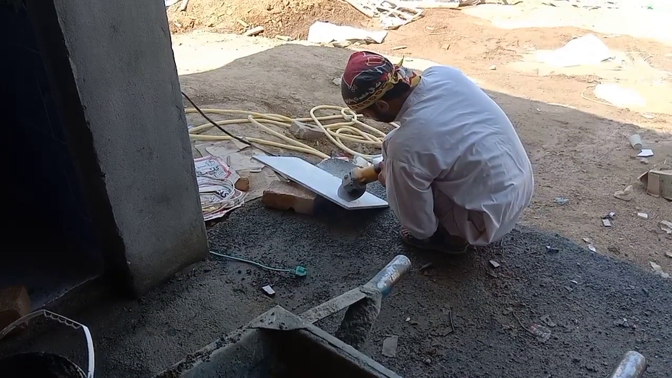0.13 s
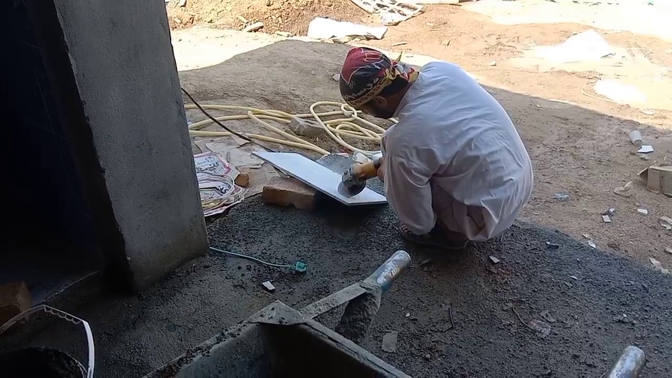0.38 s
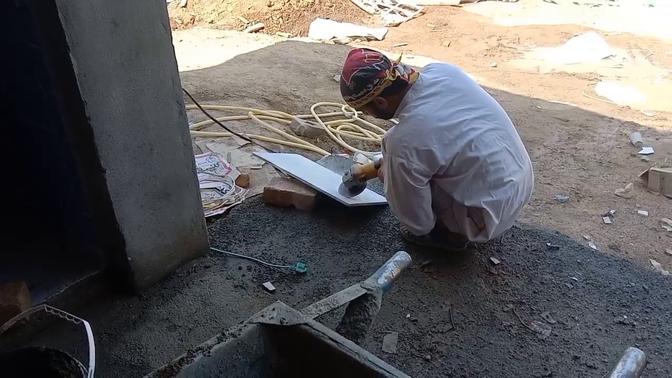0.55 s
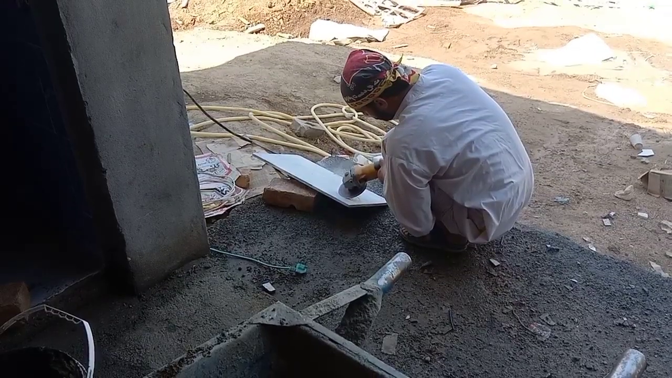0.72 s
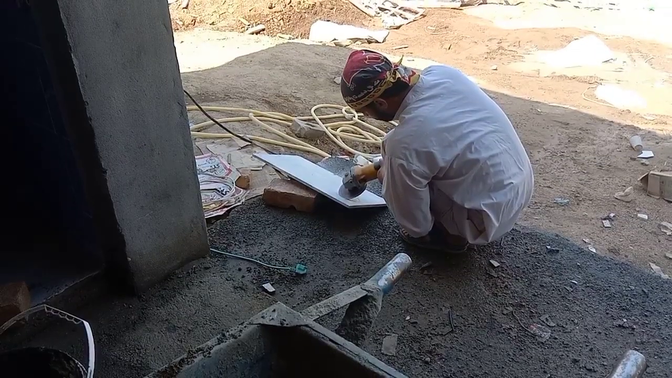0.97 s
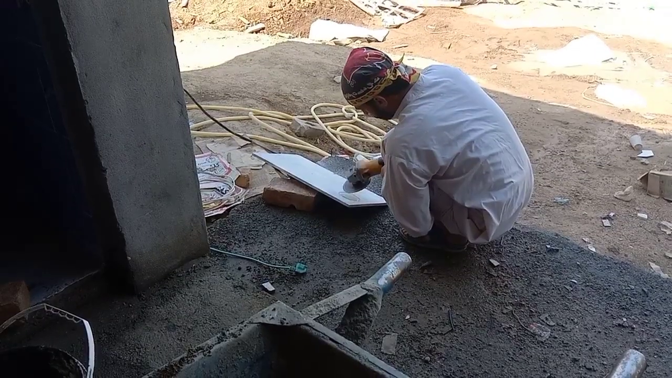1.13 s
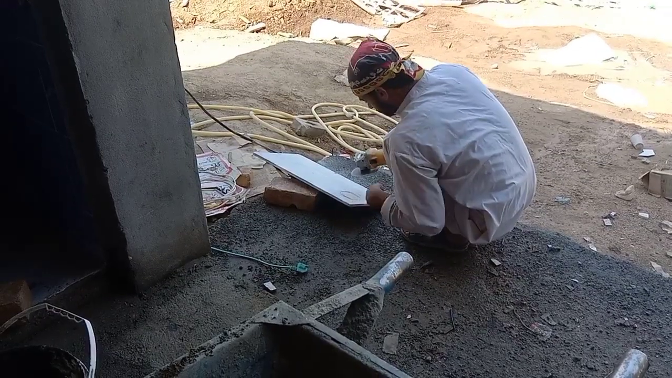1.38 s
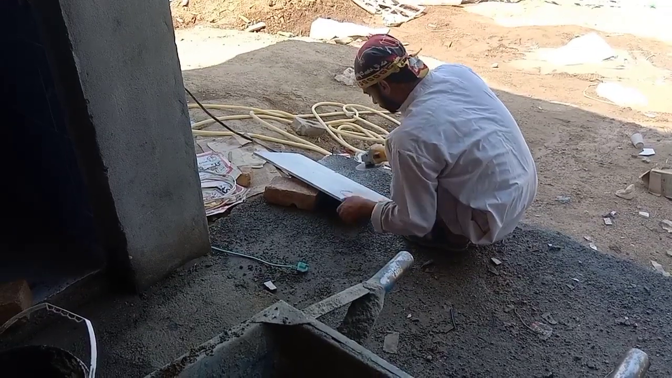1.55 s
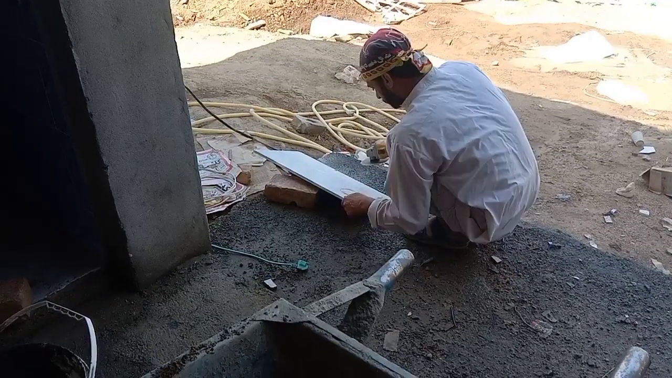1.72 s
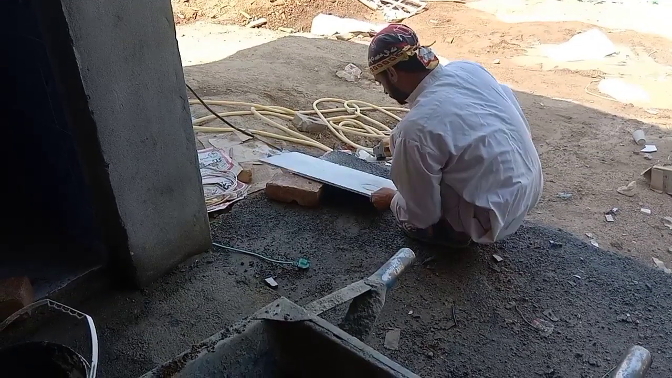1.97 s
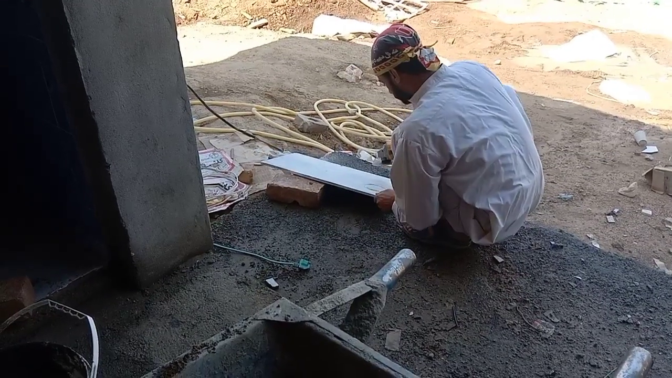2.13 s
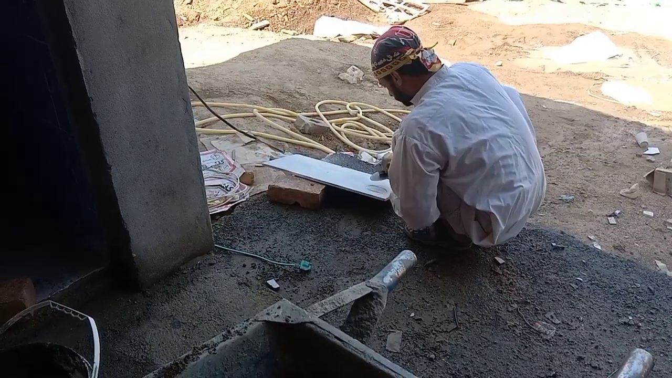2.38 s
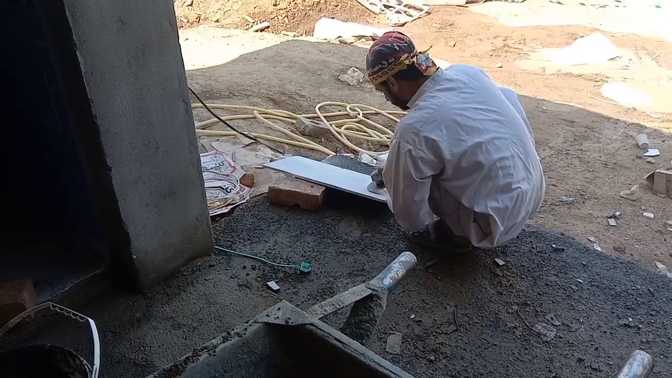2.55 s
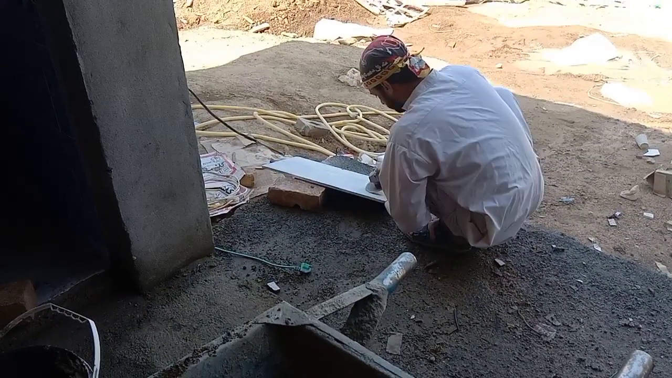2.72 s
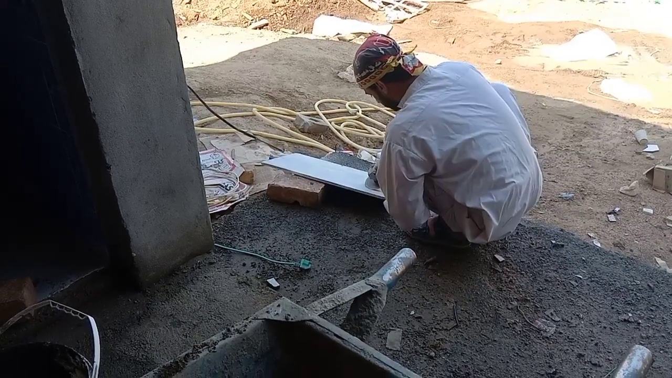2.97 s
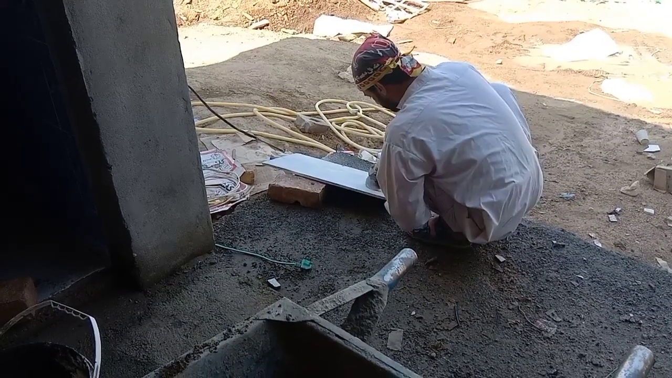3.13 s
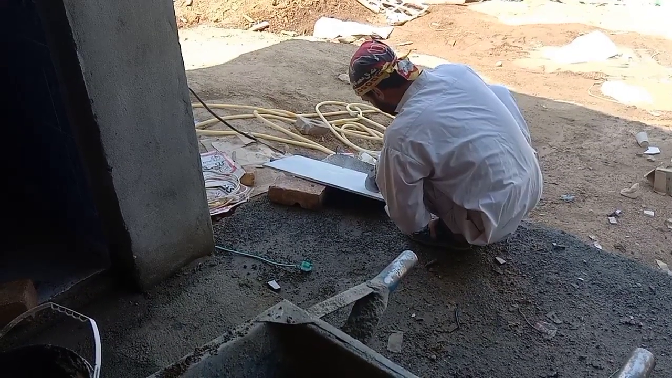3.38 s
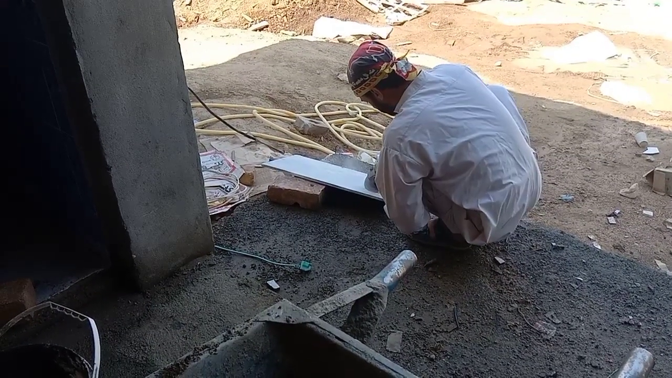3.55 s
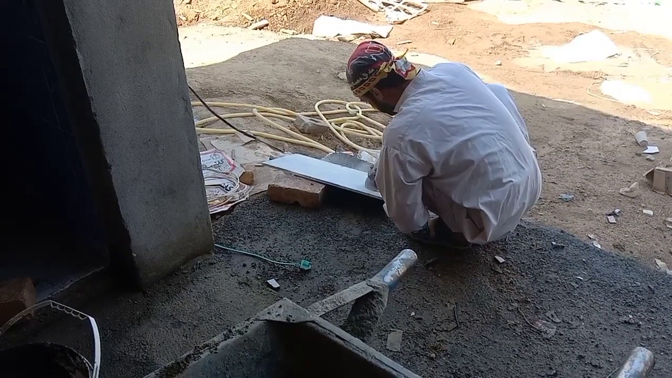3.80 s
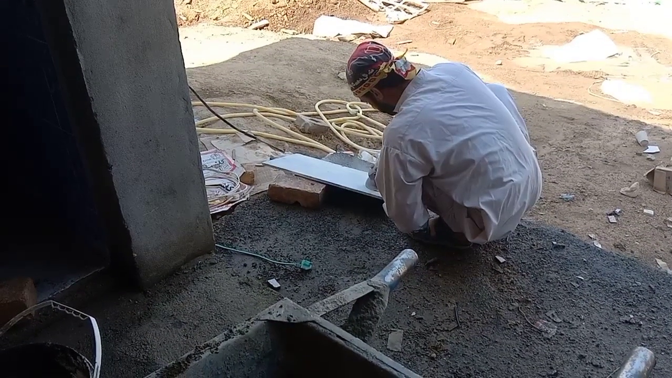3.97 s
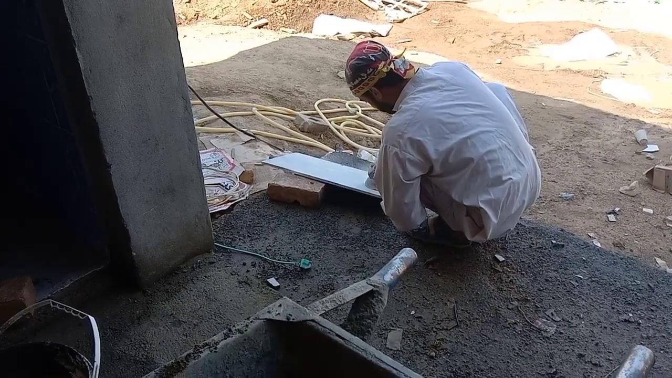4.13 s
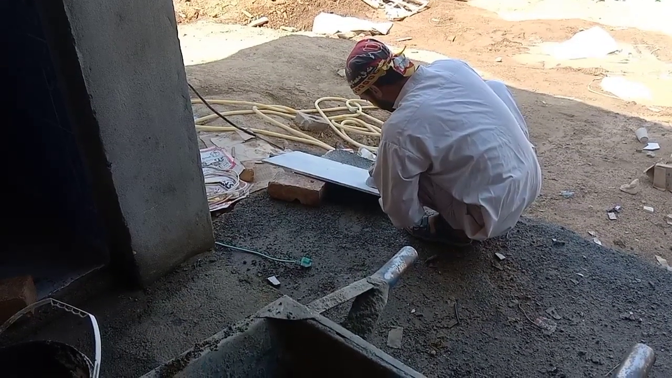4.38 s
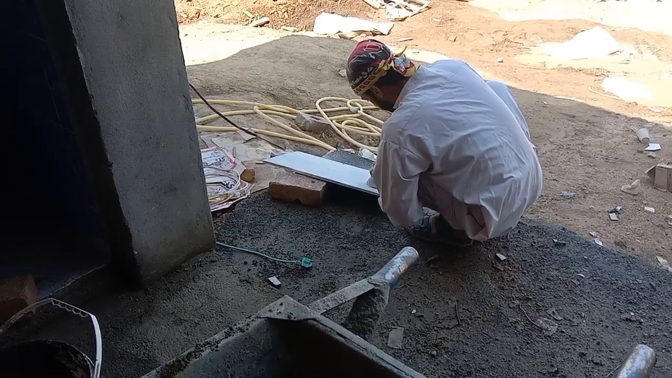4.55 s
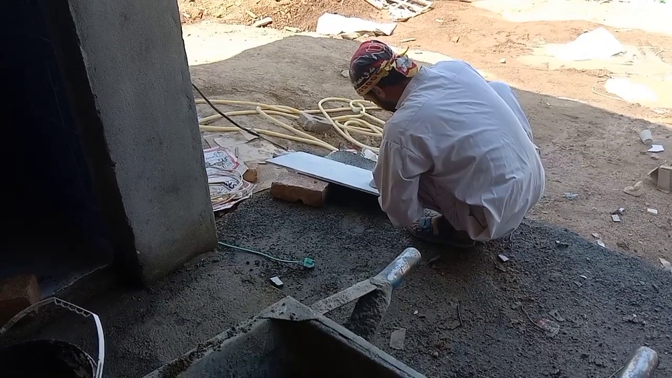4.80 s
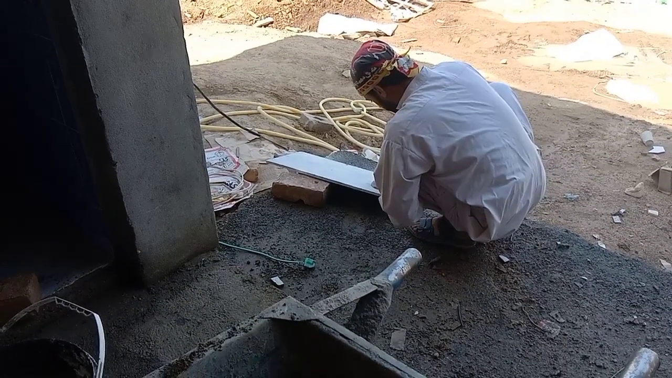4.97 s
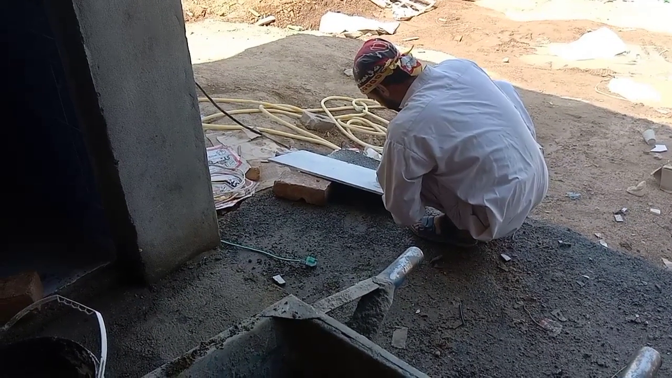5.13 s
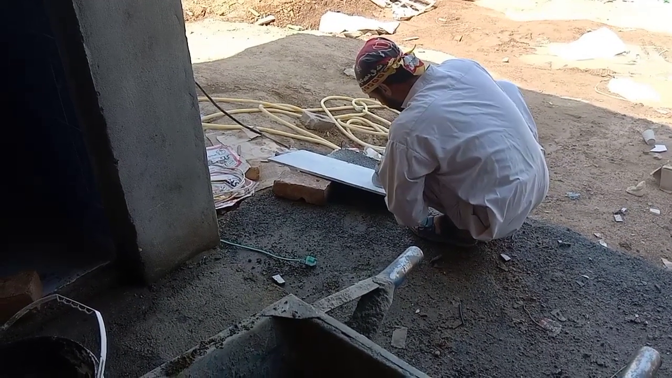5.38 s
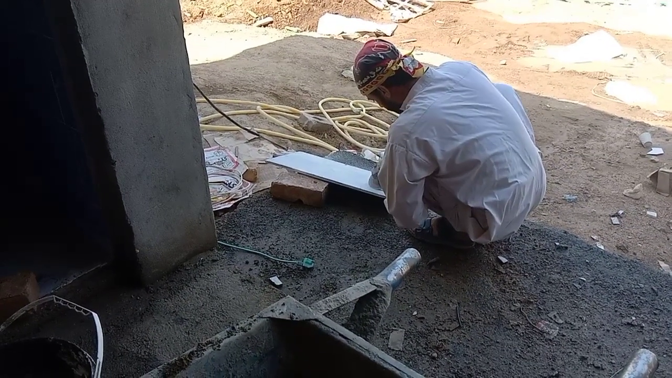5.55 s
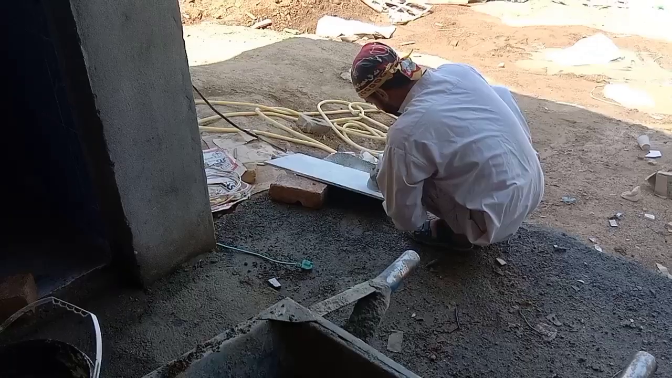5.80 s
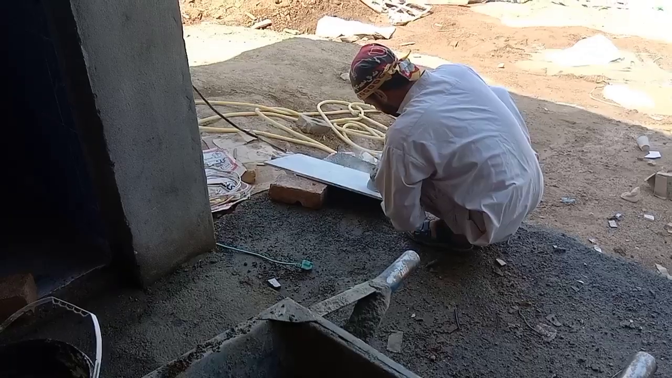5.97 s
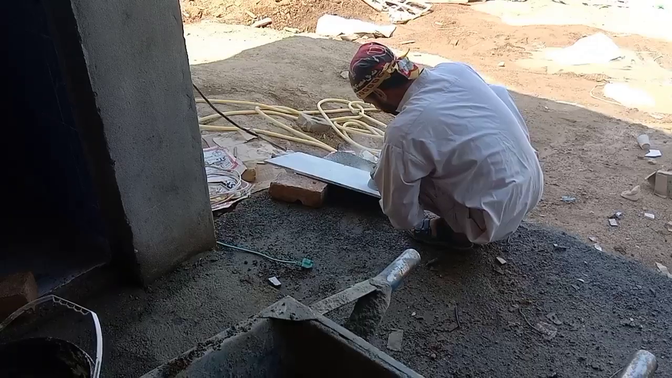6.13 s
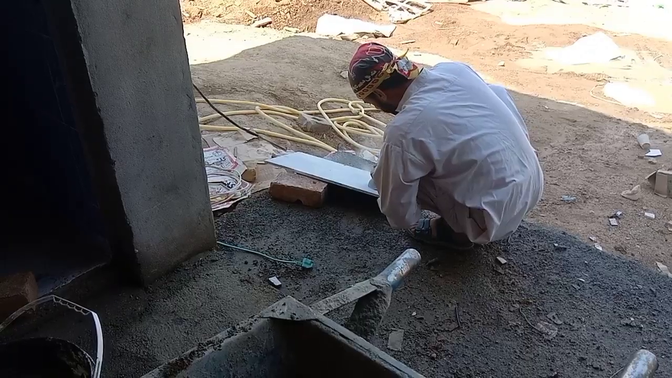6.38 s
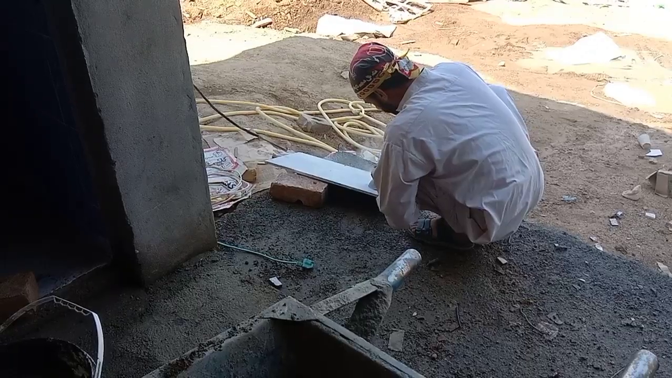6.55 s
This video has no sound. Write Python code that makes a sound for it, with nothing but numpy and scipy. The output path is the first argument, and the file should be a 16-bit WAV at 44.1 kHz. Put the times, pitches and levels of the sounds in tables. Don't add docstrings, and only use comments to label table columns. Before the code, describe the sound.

Loud metallic grinding of a spinning disc on marble, with brief free-running motor hum and hiss between passes, close and slightly overdriven.

```python
import sys
import numpy as np
from scipy import signal
from scipy.fft import rfft, irfft
from scipy.io import wavfile
from scipy.ndimage import uniform_filter1d

SR = 44100
rng = np.random.default_rng(int(sys.argv[2]) if len(sys.argv) > 2 else 0)


def waveform_to_disk(signal):
    frames = np.transpose(np.atleast_2d(signal))
    scaled = np.clip(frames, -1, 1) * 32767
    samples = np.round(scaled).astype(np.int16)
    wavfile.write(sys.argv[1], SR, samples)


def voltage_ratio(decibels):
    exponent = np.asarray(decibels, float) / 20
    return 10 ** exponent


N = 291942

SHALLOW_FROM_S, DEEP_FROM_S, SINKING_S = 2.0, 3.7, 0.32
BRIEF_S = .3


def rms_one(x):
    return x / np.sqrt(np.mean(x ** 2) + 1e-20)


def in_time(rows):
    s, *columns = np.transpose(rows)
    return [np.interp(np.arange(N) / SR, s, column) for column in columns]


def drift(rate_hz):
    r = np.exp(-80 * np.pi * rate_hz / SR)
    slow = signal.lfilter([1], [1, -2 * r, r * r], rng.standard_normal(N // 40 + 2002))
    slow = slow[2000:]
    return np.interp(np.arange(N) / 40, np.arange(len(slow)), rms_one(slow))


def resonate(x, hz, width_hz):
    r = np.exp(-np.pi * max(width_hz, 4) / SR)
    return signal.lfilter([(1 - r * r) / 2, 0, (r * r - 1) / 2], [1, -2 * r * np.cos(2 * np.pi * hz / SR), r * r], x)


def resonate_twice(x, hz, width_hz, second_width_hz):
    return resonate(resonate(x, hz, width_hz), hz, second_width_hz)


def coloured(x, spectrum):
    hz, db = np.transpose(spectrum)
    grid_hz = np.fft.rfftfreq(N, 1 / SR) + 1
    gain = voltage_ratio(np.interp(np.log(grid_hz), np.log(hz), db))
    return rms_one(irfft(rfft(x) * gain, N))


def grit(per_s, spread_db):
    sizes = voltage_ratio(spread_db * np.minimum(rng.exponential(1, N), 4)) * rng.choice([-1, 1], N)
    return rms_one(sizes * (rng.random(N) < per_s / SR))


# [lands t/s, lifts t/s, contact level/dB, top modes over contact level/dB,
# slab ring at first level/dB]
CUTS = [
    (-1.0, 1.1, -17, 0, -60),
    (2.611, 2.693, -11.5, 1, -40),
    (2.738, 2.815, -27, 6, -44),
    (2.83, 5.005, -13.3, -2, -50),
    (5.337, 5.358, -14, -6, -30),
    (5.486, 5.518, -26, 10, -42),
    (5.55, 7.0, -13.3, -2, -46),
    (6.0, 7.0, -34, 8, -60),
]
# [t/s, level/dB]
HAND_PRESSURE = [(0, 0), (.2, 1), (1.05, -1), (2.83, -7), (2.86, -.5), (2.93, -1.5), (2.96, -4.5),
                 (3.05, -1), (3.2, -1.5), (3.27, -5.5), (3.33, -1), (3.43, -1.5), (3.6, 1.5), (4.6, -1),
                 (5.0, -.5), (5.62, -2), (5.8, .5), (6.62, 0)]


def passes():
    bite_s, lift_db_per_s, bounce_db_per_s, top_lift_db_per_s = .003, 135., 330., 150.
    slab_full_db, slab_builds_s, slab_waver_db = -31, .45, 2.5
    t = np.arange(N) / SR
    contact, top, ring = np.full((3, N), 1e-6)
    for lands, lifts, db, top_db, slab_db in CUTS:
        bite = np.clip((t - lands) / bite_s, 0, 1)
        after = np.maximum(t - lifts, 0)
        fall_db_per_s = lift_db_per_s if lifts - lands > BRIEF_S else bounce_db_per_s
        hold = bite * voltage_ratio(-after * fall_db_per_s)
        still_to_grow = np.exp(-np.clip(t - max(lands, 0), 0, 9) / slab_builds_s)
        growing_db = slab_full_db + (slab_db - slab_full_db) * still_to_grow
        contact = contact + voltage_ratio(db) * hold
        top = top + voltage_ratio(db + top_db - top_lift_db_per_s * after) * hold
        if lands > SHALLOW_FROM_S and db > -30:
            ring = ring + voltage_ratio(growing_db - top_lift_db_per_s * after) * hold
    contact_db, top_db, ring_db = 20 * np.log10([contact, top / contact, ring])
    return contact_db + in_time(HAND_PRESSURE)[0], top_db, ring_db + slab_waver_db * drift(6.0)


# [f/Hz, width f/Hz, level/dB]
EDGE_MODES = [(1010, 120, -19), (1600, 150, -19), (2350, 30, -14), (3090, 61, -2), (3280, 45, -5),
              (3520, 67, 0), (3950, 69, 1), (4390, 43, -10), (4770, 32, -14), (5050, 62, -1),
              (5610, 63, -3), (6500, 50, 0), (7200, 43, -7), (7960, 73, -22), (8340, 42, -17),
              (9110, 43, -12), (9860, 48, -13), (10500, 57, -9), (11200, 48, -5), (11900, 50, -8),
              (12800, 90, -15), (13600, 57, -14), (13900, 140, -11), (14200, 34, -8), (15000, 55, -19),
              (15400, 65, -19)]
# [f/Hz, width f/Hz, level/dB]
SHALLOW_MODES = [(1440, 62, -19), (2410, 28, -18), (2730, 26, -14), (3000, 73, -6), (3270, 33, -4),
                 (3500, 92, -4), (4050, 52, -7), (4320, 22, -9), (5110, 55, -1), (5520, 55, -5),
                 (5820, 90, -13), (6410, 35, -8), (6620, 41, 0), (7100, 35, -15), (8130, 58, -25),
                 (8460, 45, -19), (8980, 30, -11), (9440, 29, -19), (10100, 34, -11), (10600, 42, -11),
                 (11100, 33, -8), (11500, 49, -17), (11800, 95, -19), (12200, 42, -11), (12600, 28, -25),
                 (13000, 39, -12), (13400, 26, -14), (13700, 62, -12), (14500, 48, -14), (15100, 96, -22)]
# [f/Hz, width f/Hz, level/dB]
DEEP_MODES = [(1670, 150, -19), (1940, 42, -17), (2410, 27, -15), (3130, 57, -7), (3500, 69, -3),
              (4010, 77, -8), (4340, 44, -11), (5050, 70, -4), (5580, 35, -3), (6550, 46, 0),
              (6920, 24, -18), (7170, 58, -13), (8050, 86, -26), (8390, 51, -18), (9060, 69, -16),
              (9600, 63, -20), (9950, 85, -16), (10500, 44, -11), (11200, 55, -14), (11600, 98, -18),
              (12000, 150, -17), (12900, 63, -13), (13500, 48, -16), (13900, 120, -13), (14300, 130, -13),
              (15000, 89, -25), (15400, 50, -22)]
# [f/Hz, level/dB]
DISC_RADIATION = [(1500, -3), (3300, -3.5), (4300, -2.5), (5300, -3), (6600, -1.5), (8000, -1.5),
                  (11000, -0.5), (13500, 0), (15500, -8)]
# [f/Hz, level/dB per Hz]
DUST_SPECTRUM = [(150, -73), (250, -48.5), (755, -39.5), (1050, -27.5), (2240, -9.5), (3450, 6.5),
                 (4630, -17.5), (4960, -3), (6000, -7.5), (6650, 7), (7900, -36.5), (14000, -4),
                 (15500, -13)]


def disc(contact_db, top_db):
    t = np.arange(N) / SR
    deep = np.clip((t - DEEP_FROM_S) / SINKING_S + .5, 0, 1)
    seats = [(EDGE_MODES, 1. * (t < SHALLOW_FROM_S)),
             (SHALLOW_MODES, (t >= SHALLOW_FROM_S) * (1 - deep)),
             (DEEP_MODES, deep)]
    chips = grit(9000., spread_db=3.5) * voltage_ratio(1.18 * drift(68.0))
    touch = landings(decay_s=0.017)
    low_drive = chips * (voltage_ratio(contact_db) + touch)
    top_drive = chips * (voltage_ratio(contact_db + top_db) + 0.6 * touch)
    grips = [voltage_ratio(1.2 * drift(1.5)) for k in range(5)]
    carry_hz, carry_db = np.transpose(DISC_RADIATION)
    out = np.zeros(N)
    for modes, share in seats:
        live = np.flatnonzero(share > 0)
        span = slice(live[0], live[-1] + 4000)
        for k, (hz, width_hz, db) in enumerate(modes):
            is_top = hz > 7400
            drive = (top_drive if is_top else low_drive) * grips[k % 5] * np.sqrt(share)
            drive = drive[span] + 1e-18
            spread_hz = 1.77 * width_hz
            loss_hz = width_hz * (.55 if hz < 7400 else .7)
            mode_db = db + 18 + np.interp(np.log(hz), np.log(carry_hz), carry_db)
            ring = resonate(drive, hz, loss_hz) + 0.38 * resonate_twice(drive, hz, spread_hz, spread_hz)
            out[span] += (-1) ** k * voltage_ratio(mode_db) * ring
    dust = coloured(grit(12000., spread_db=-0.5), DUST_SPECTRUM)
    return out + (voltage_ratio(contact_db - 10) + .6 * landings(decay_s=.005)) * dust


# [t/s, turns f/Hz, rotor tone level/dB, housing hum level/dB]
MOTOR_RUN = [(0.9, 395, -66, -66), (1.2, 427, -56, -62), (1.45, 442, -42, -50), (1.65, 451, -37, -48),
             (1.74, 459, -48, -45), (2.43, 480, -35, -50), (2.72, 487, -44, -55), (3.0, 487, -43, -53),
             (3.38, 479, -40, -43), (3.7, 455, -52, -53), (3.84, 449, -46, -53), (4.3, 436, -66, -58),
             (5.04, 427, -66, -62), (5.23, 440, -43, -47), (5.47, 453, -36, -47), (5.61, 456, -64, -62),
             (5.88, 447, -47, -56), (6.05, 430, -66, -58)]
# [f/Hz, level/dB per Hz]
FAN_SPECTRUM = [(150, -82), (250, -41), (418, -24.5), (463, -24), (667, -25), (935, -16.5), (1250, -15),
                (1950, -9), (2190, -14), (3350, 1.5), (4290, -12), (5750, -2), (8300, -28), (10800, -63),
                (18300, -120)]
# [f/Hz, width f/Hz, level/dB]
HOUSING_MODES = [(8950, 700, -3), (9800, 350, -9), (10450, 350, -1), (11150, 600, -1), (11900, 150, 0),
                 (12500, 200, -5), (12980, 150, 0), (14000, 2500, -13)]


def motor(contact_db):
    fan_db, fan_choke_db, fan_recovers_s = -23.0, -7.5, .12
    load_roar_db, edge_roar_db = -9.5, 4.0
    hum_hz, hum_width_hz = 546, 16
    turns, tone_db, hum_db = in_time(MOTOR_RUN)
    recovery = int(fan_recovers_s * SR)
    loaded = uniform_filter1d(1. * (contact_db > -25), size=recovery * 2 + 1, origin=recovery)
    on_edge = np.arange(N) < SHALLOW_FROM_S * SR
    fan = voltage_ratio(fan_db + fan_choke_db * loaded ** 2)
    roar = voltage_ratio(contact_db + load_roar_db + edge_roar_db * on_edge)
    air = np.hypot(fan, roar)

    phase = 2 * np.pi * np.cumsum(uniform_filter1d(turns, size=3000) + 1.06 * drift(23.0)) / SR
    level = voltage_ratio(tone_db + 1.0 + 2.2 * drift(12.))
    tone = np.sqrt(2) * level * (np.sin(phase) + voltage_ratio(-14.0) * np.sin(2 * phase))

    rattle = grit(6000., spread_db=1.5) * voltage_ratio(0.4 * drift(21.0) + 0.72 * drift(40.0))
    whir = grit(7600.0, spread_db=5.0)
    housing = np.zeros(N)
    for hz, width_hz, db in HOUSING_MODES:
        housing += voltage_ratio(db + 1.3 * drift(8.)) * resonate_twice(whir, hz, width_hz, 1.3 * width_hz)
    hiss = coloured(rattle, FAN_SPECTRUM) + voltage_ratio(-12) * rms_one(housing)
    hum = rms_one(resonate_twice(rng.standard_normal(N), hum_hz, hum_width_hz, 80.))
    return tone + air * hiss + voltage_ratio(hum_db - 2.5) * hum


def ground():
    shake_db, shallow_db, lumps_db, idle_db = -58, -19, 4.0, -82
    t = np.arange(N) / SR
    band = signal.butter(2, [60., 220.], "band", fs=SR, output="sos")
    lumps = signal.sosfilt(band, grit(260., spread_db=2.5))
    pressed = np.zeros(N)
    for lands, lifts, *_ in CUTS:
        if lifts - lands > BRIEF_S:
            pressed += (t > lands) * (t < lifts)
    shallow = (t >= SHALLOW_FROM_S) * np.clip((DEEP_FROM_S - t) / SINKING_S * 4 - 1, 0, 1)
    level_db = shake_db + shallow_db * shallow + lumps_db * drift(9.0)
    return (pressed * voltage_ratio(level_db) + voltage_ratio(idle_db)) * rms_one(lumps)


def concrete_room(x, t60, level_db):
    t = np.arange(SR // 2) / SR
    tail = rng.standard_normal(len(t)) * voltage_ratio(-60 * t / t60) * (t > .008)
    tail = signal.lfilter([1], [1, -.4], tail)
    return voltage_ratio(level_db) * signal.fftconvolve(x, tail / np.sqrt(np.sum(tail ** 2)))[:N]


# [f/Hz, width f/Hz, level/dB]
SCRAPE_MODES = [(239, 57, -0.5), (370, 33, 1), (1040, 200, 14.5), (1310, 170, 13)]
# [f/Hz, width f/Hz, level/dB]
UPPER_PLATE_MODES = [(1410, 60, -6), (2410, 25, -5)]


def slab(ring_db):
    nudge_s, nudge_db, rise_db_per_s, fall_db_per_s = 2.05, -49, 70., 170.
    plate_hz, plate_width_hz = 1071, 16
    scrape = grit(900., spread_db=0.5)
    thud = np.zeros(N)
    for hz, width_hz, db in SCRAPE_MODES:
        thud += voltage_ratio(db) * rms_one(resonate_twice(scrape, hz, width_hz, 2 * width_hz))
    since = np.arange(N) / SR - nudge_s
    thud_db = nudge_db + np.minimum(rise_db_per_s * since, -fall_db_per_s * since)

    shake = rng.standard_normal(N)
    ring = rms_one(resonate_twice(shake, plate_hz, plate_width_hz, 100.0))
    ring /= (uniform_filter1d(ring ** 2, size=1500) + 0.068) ** .25
    for hz, width_hz, db in UPPER_PLATE_MODES:
        ring += voltage_ratio(db) * rms_one(resonate_twice(shake, hz, width_hz, 2.9 * width_hz))
    return voltage_ratio(ring_db - 2.5) * ring + voltage_ratio(thud_db) * thud


# [t/s, peak level/dB]
RIM_LANDINGS = [
    (2.612, -7),
    (2.7394, -18),
    (2.83, -17),
    (2.8959, -13),
    (3.2844, -14.5),
    (5.339, -7.5),
    (5.486, -10),
    (5.5508, -9),
    (6.0177, -8.5),
]


def landings(decay_s):
    t = np.arange(N) / SR
    spray = np.zeros(N)
    for s, db in RIM_LANDINGS:
        spray += voltage_ratio(db - 4.5) * (t >= s) * np.exp(-np.maximum(t - s, 0) / decay_s)
    return spray


def scene():
    contact_db, top_db, ring_db = passes()
    dry = disc(contact_db, np.maximum(top_db, -30)) + motor(contact_db) + slab(ring_db)
    wet = dry + concrete_room(dry, t60=0.16, level_db=-10)
    wet = signal.sosfilt(signal.butter(4, 140., "high", fs=SR, output="sos"), wet)
    return np.tile(wet + ground(), (2, 1))


def band_limit(x):
    return signal.sosfilt(signal.butter(12, 15950, fs=SR, output="sos"), x)


def record(dry):
    bent = dry / (1 + (np.abs(dry) / .82) ** 6) ** (1 / 6)
    bass_cut = signal.sosfilt(signal.butter(1, 80., "high", fs=SR, output="sos"), bent)
    top_cut = signal.sosfilt(signal.ellip(12, .5, 70, 15480, fs=SR, output="sos"), bass_cut)
    return band_limit(top_cut)


dry = scene()
out = record(dry)
waveform_to_disk(out)
```